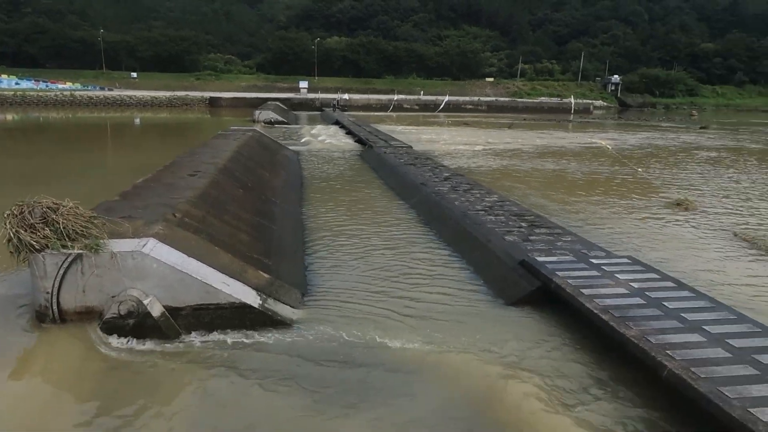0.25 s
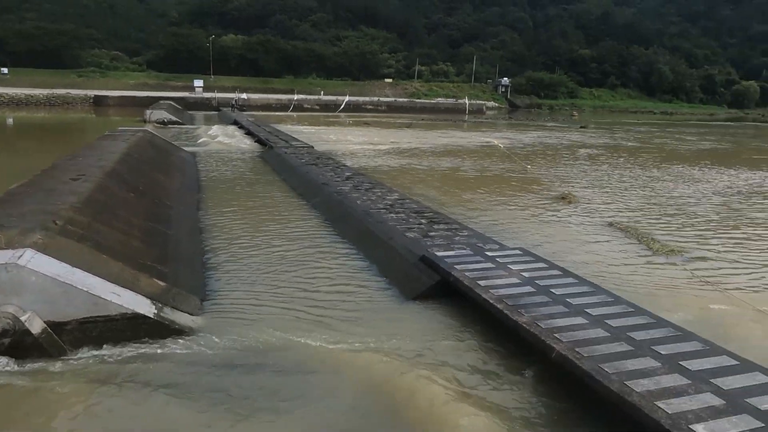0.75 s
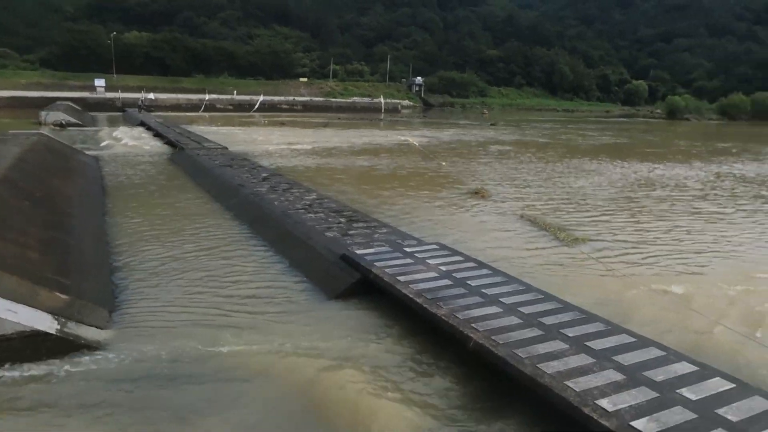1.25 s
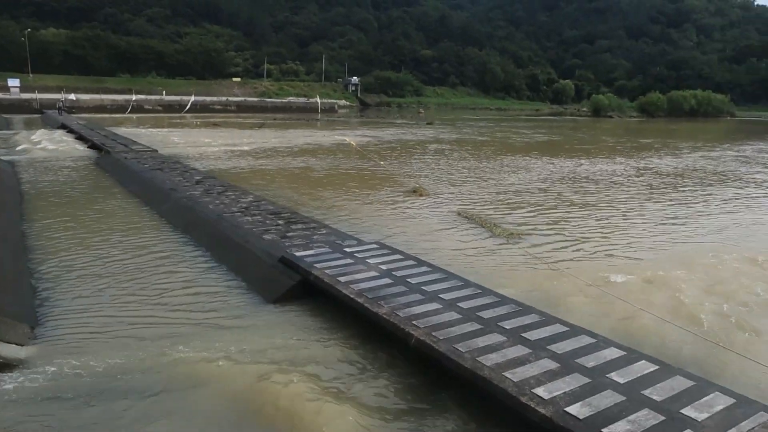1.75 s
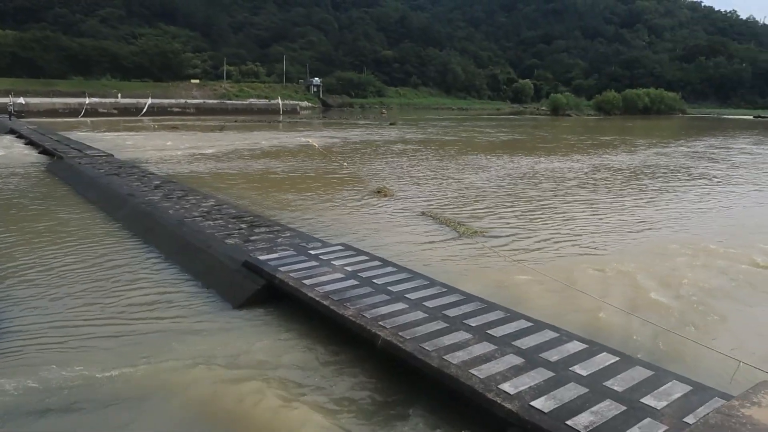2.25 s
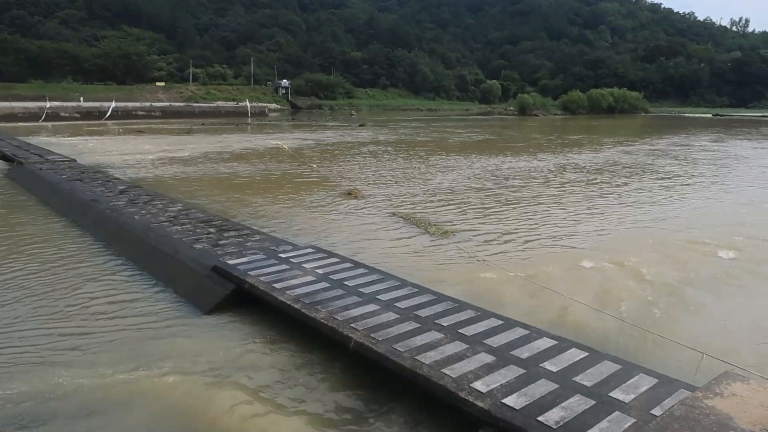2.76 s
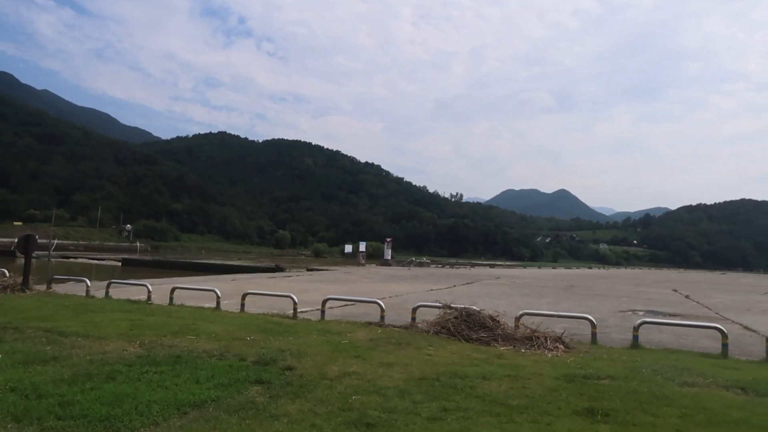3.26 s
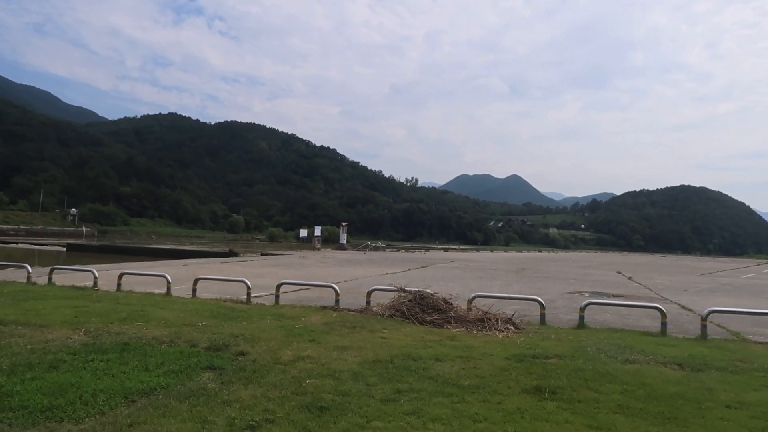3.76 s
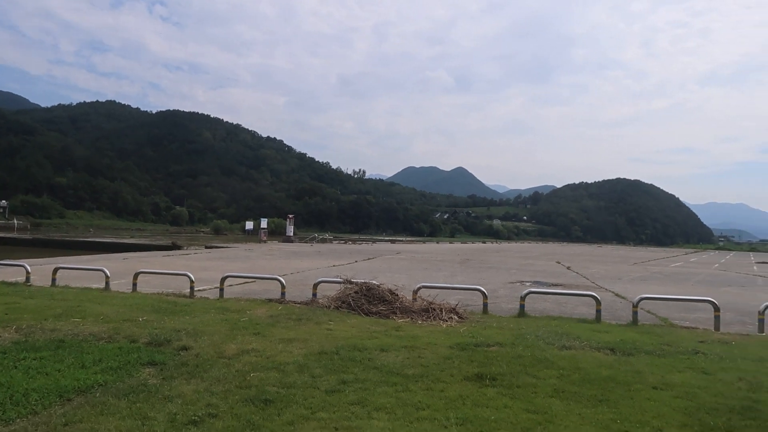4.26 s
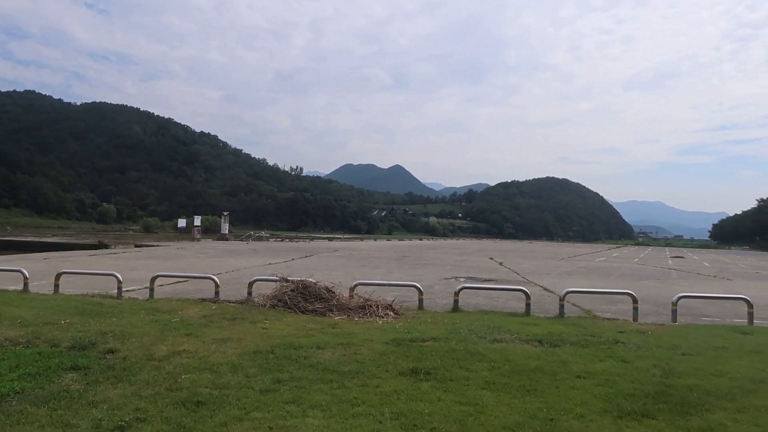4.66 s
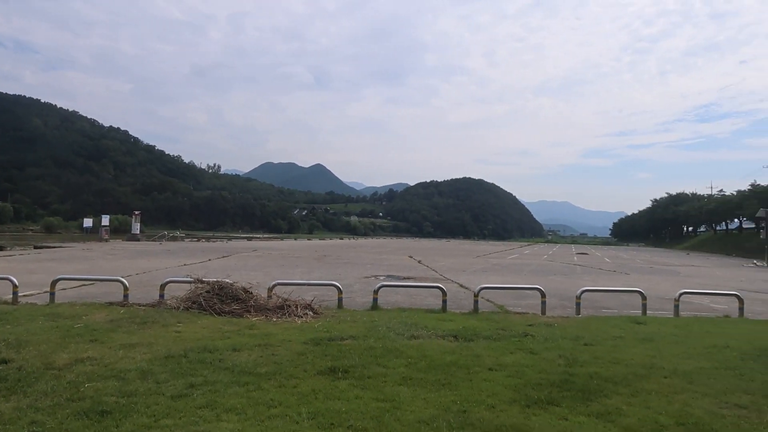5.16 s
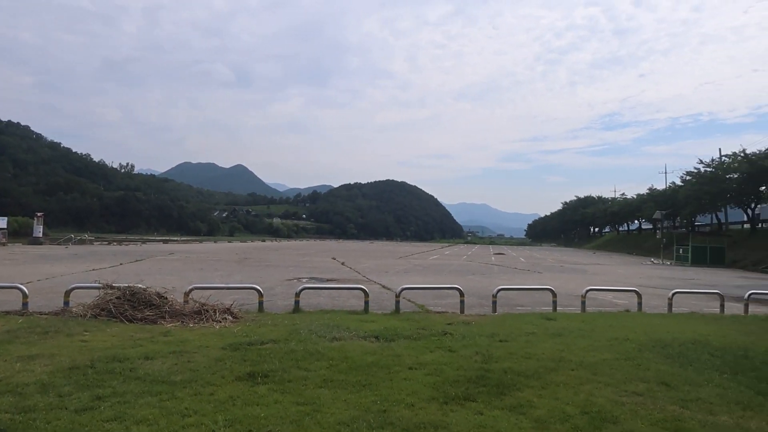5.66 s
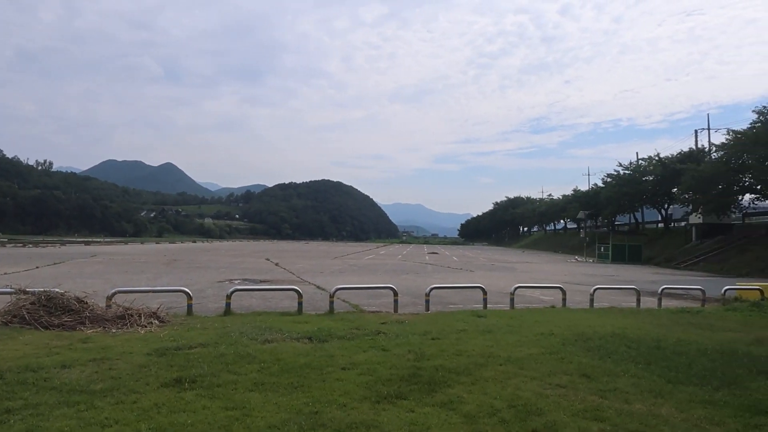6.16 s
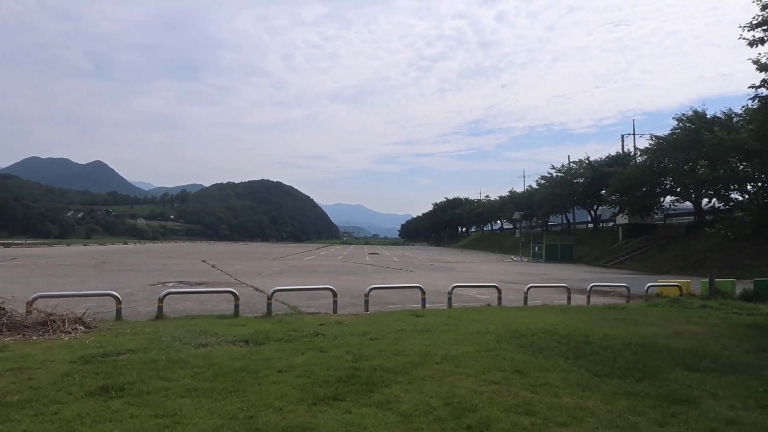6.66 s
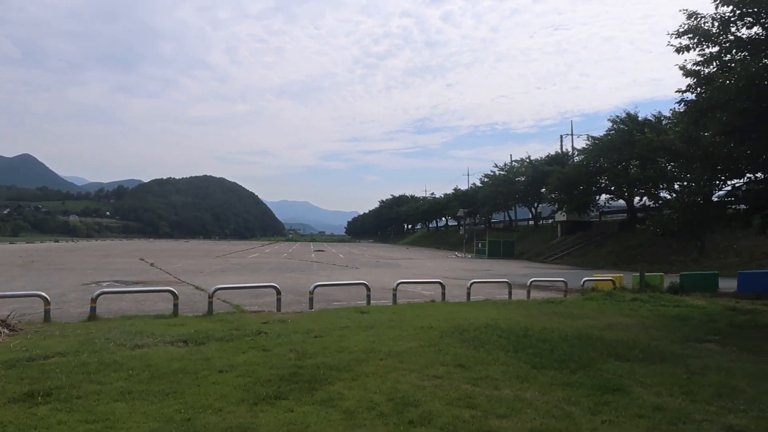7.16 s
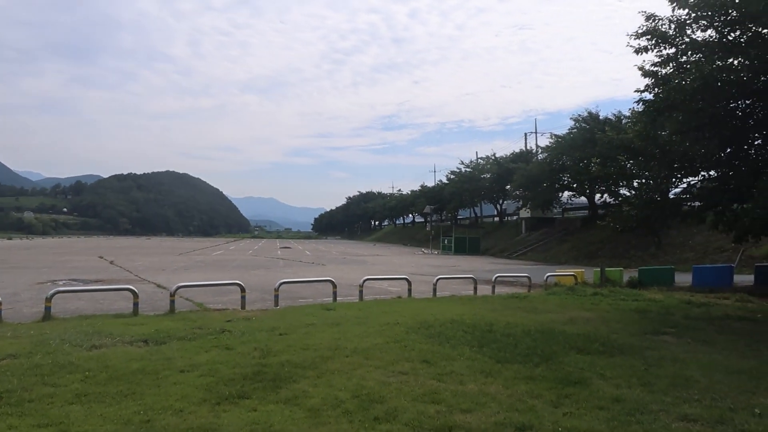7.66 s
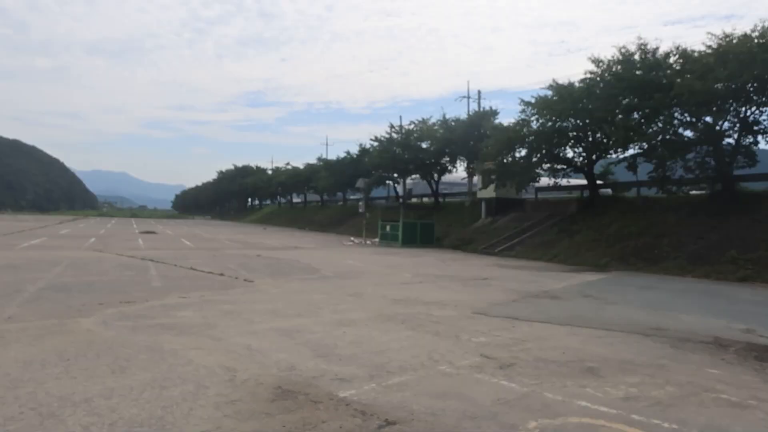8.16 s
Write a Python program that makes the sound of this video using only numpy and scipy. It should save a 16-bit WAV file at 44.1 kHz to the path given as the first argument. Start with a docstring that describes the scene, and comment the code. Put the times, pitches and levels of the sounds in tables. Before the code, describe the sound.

River water rushes loudly over a concrete weir outdoors, with hissing spray, bubbling and a few deep glugs. After about three seconds it cuts off, and cicadas take over in the trees beside a quiet riverside lot. One high-pitched buzz leads, then blends into a swelling chorus as the microphone turns towards the trees. A faint low wash of the valley lies behind them.

```python
"""Cicadas buzz in the trees by a quiet riverside lot, heard after a river roars over a concrete weir.
First comes the weir: clouds of ringing bubbles, spray and big glugs, over a low drone. After a short
silence, one cicada sings in front of a chorus, snapping the ribs of its tymbals (tiny drums on its body).
The valley murmurs and hums behind them, and there is one faint chirp. The camera turns towards the
trees, so they grow louder; for the last moment it stands closer to them."""
import sys
import numpy as np
from scipy import signal
from scipy.fft import rfft, irfft, next_fast_len
from scipy.io import wavfile
from scipy.ndimage import uniform_filter1d

SR = 44100
rng = np.random.default_rng(int(sys.argv[2]) if len(sys.argv) > 2 else 0)


def waveform_to_disk(signal):
    """Save audio, clipped to [-1, 1], as 16-bit WAV at the path in sys.argv[1]."""
    frames = np.transpose(np.atleast_2d(signal))
    scaled = np.clip(frames, -1, 1) * 32767
    samples = np.round(scaled).astype(np.int16)
    wavfile.write(sys.argv[1], SR, samples)


N = 370868
TIME = np.arange(N) / SR
WEIR_END_S, LOT_START_S, CLOSER_S = 2.846, 2.891, 8.217

# the weir's roar as the camera hears it, with microphone resonances near 3600 and 4650 Hz:
# (frequency [Hz], relative level [dB])
PLUNGE_TONE = [(25, -45), (45, -53), (85, -13), (130, -10.5), (160, -6), (250, -2.5), (370, -0.5),
               (480, -2.5), (620, -9.5), (900, -67)]
RUSH_TONE = [(350, -46), (620, -5), (840, 0), (1000, -2.5), (1230, -0.5), (1900, -8.5), (2600, -8.5),
             (3600, -35.5)]
SPRAY_AS_HEARD = [(2000, -22), (3050, -8), (3600, -0.5), (4200, -4.5), (4650, 1.5), (5300, -2), (6200, -1),
                  (8000, -9), (10500, -19.5), (13000, -28), (15500, -53)]
# the loudest glugs of the plunge: (time [s], pitch [Hz], peak level [dB])
BIG_GLUGS = [(0.546, 382, -26), (0.661, 390, -27), (0.932, 371, -30), (1.156, 433, -29), (1.235, 365, -30),
             (1.585, 282, -29.5), (1.865, 494, -29.5), (2.178, 357, -30), (2.395, 510, -29.5),
             (2.795, 387, -30)]
# a cicada's ribs snap in, then out: (place in the cycle [0-1], relative level [dB], pitch [Hz])
RIB_SNAPS = [(0.061, -11, 5200), (.16, -3.5, 8150), (.24, -3, 5190), (.35, -9, 8150), (.42, -2, 5130),
             (.51, -2.5, 8000), (.58, -0.5, 5130), (.70, -2.5, 8200)]
# the tone of the cicadas' song: (frequency [Hz], relative level [dB])
SONG_TONE = [(2400, -46), (3000, -21), (3500, -8), (4200, -6), (4800, -2.5), (6000, -2), (7800, -4),
             (9700, -9.5), (11200, -11.5), (12200, -22.5), (14000, -29.5), (15000, -51)]
# shrill peaks and dips heard in one cicada and in the chorus: (frequency [Hz], width [Hz], boost [dB])
NEAR_PEAKS = [(3360, 90, 4), (3530, 110, 3.5), (3960, 90, 6), (4070, 100, -6), (4400, 160, 4),
              (4540, 90, -2.5), (4740, 100, 4), (4930, 130, -2.5), (5297, 70, 6), (5445, 70, -4),
              (5534, 80, 5.5), (5750, 200, 1.5), (6125, 100, 2), (6305, 90, -3), (6480, 80, -3),
              (6740, 110, -4), (6847, 100, 5.5), (7213, 100, 4), (7450, 110, -2.5), (7816, 130, 6),
              (8053, 150, -4), (8290, 100, -2), (8936, 200, 2), (9370, 150, 2), (9560, 130, -3),
              (10720, 150, 3), (11240, 180, 3), (12320, 200, 4), (12835, 160, 7)]
CHORUS_PEAKS = [(2830, 110, 5), (3380, 90, 2.5), (3530, 120, 3), (4050, 80, -3), (4651, 80, 5.5),
                (5297, 80, 4.5), (5447, 70, -3), (5534, 70, 2), (5650, 600, 1.5), (5857, 90, 4.5),
                (6007, 80, 4.5), (6869, 110, 2), (7622, 90, 2), (7816, 110, 3.5), (8333, 130, -3),
                (8677, 90, 5), (8979, 130, -2), (9570, 160, -3.5), (10600, 600, -3.5), (11200, 300, 1),
                (12500, 600, 3)]
# one cicada leads, then sinks into the chorus: (time [s], cicada level [dB], chorus level [dB])
SONG_LEVELS = [(2.9, -44.5, -41.5), (4.1, -36, -42), (5.0, -35.5, -40.5), (5.9, -33.5, -41),
               (6.3, -34.5, -37.5), (6.7, -34.5, -37.5), (7.45, -35, -33), (8.2, -39.5, -30.5)]
# whines in the trees: (start [s], end [s], pitch [Hz], width [Hz], level [dB])
TREE_WHINES = [(2.5, 3.9, 5540, 90, -56), (3.5, 5.25, 5500, 280, -49.5), (3.6, 5.1, 4330, 170, -54),
               (4.9, 8.7, 4690, 110, -50), (5.6, 6.9, 3360, 110, -59)]
# the valley's wash, the far-off weir and a murmur by the trees: (frequency [Hz], relative level [dB])
VALLEY_TONE = [(25, -32), (50, -17), (86, -4.5), (128, -3.5), (165, -4.5), (205, -4.5), (272, -3.5),
               (320, -6), (550, -8.5), (850, -9), (1700, -13.5), (2800, -14), (3800, -47)]
FAR_WEIR_TONE = [(50, -12), (100, 9), (220, 9), (330, -6), (560, -15), (800, 0.5), (1250, -1), (1900, -15),
                 (3600, -40)]
MURMUR_TONE = [(50, -15), (100, 4), (170, 7), (300, -4), (480, 4), (620, -1.5), (850, 5), (1200, -12),
               (2500, -17), (4000, -35)]
# a distant hum: (pitch [Hz], width [Hz], level [dB])
HUM_NOTES = [(97.6, 12, -75), (169, 25, -67), (273, 24, -68)]
# how alike each source is in the left and right microphones: (frequency [Hz], likeness [0-1])
WEIR_ALIKE = [(130, .999), (300, .994), (650, .96), (1400, .84), (2600, .62), (4300, .15), (7200, .48),
              (10000, .2), (15000, .15)]
NEAR_ALIKE = [(3000, 0.4), (4200, 0.93), (5800, 0.88), (8000, 1), (11000, 0.92), (13000, 1)]
CHORUS_ALIKE = [(2900, .35), (3500, 0.51), (4600, 0.67), (5500, 0.7), (6600, 0.82), (7500, 0.68),
                (9000, 0.58), (11300, 0.84), (14000, 0.75)]
VALLEY_ALIKE = [(130, .999), (300, .985), (650, .92), (1400, .75), (2600, .5)]
# how far the left wave runs ahead of the right (trees: when side-on): (frequency [Hz], lead [rad])
WEIR_LEAD = [(100, 0), (500, .1), (1700, .45), (3000, .7), (5000, 2.9), (8000, 3.2), (13000, 5)]
TREES_LEAD = [(2500, -2.1), (3700, -2.75), (4700, -2.95), (6000, -3.75), (8400, -5.9), (11300, -8),
              (14000, -10.3)]
VALLEY_LEAD = [(100, 0), (400, .08), (900, .3), (2200, .8)]


def gain_of(db):
    """Turns decibels into a number to multiply a sound by."""
    return 10 ** (np.asarray(db) / 20)


def evened(x):
    """Scales a signal so that its average strength (rms) is 1."""
    return x / np.sqrt(np.mean(x ** 2) + 1e-20)


def look_up(table, hz):
    """Reads between the rows of a table, giving each octave equal room."""
    row_hz, value = np.transpose(table)
    return np.interp(np.log(hz + 1), np.log(row_hz + 1), value)


def colour(x, tone):
    """Gives a sound the tone in a table, at strength 1."""
    size = next_fast_len(N)
    gains = gain_of(look_up(tone, np.fft.rfftfreq(size, 1 / SR)))
    return evened(irfft(rfft(x, size) * gains, size)[..., :N])


def hiss():
    """Two unrelated plain noises, left and right."""
    return rng.standard_normal((2, N))


def narrow_noise(hz, width_hz):
    """Two unrelated noises, each ringing around one pitch."""
    size = next_fast_len(N)
    off_pitch = 2 * (np.fft.rfftfreq(size, 1 / SR) - hz) / width_hz
    spectrum = rfft(rng.standard_normal((2, size))) / np.sqrt(1 + off_pitch ** 4)
    return evened(irfft(spectrum, size)[:, :N])


def wander(length_s):
    """A smooth random curve that changes over about length_s."""
    size = next_fast_len(N)
    smoothing = np.exp(-(np.fft.rfftfreq(size, 1 / SR) * length_s) ** 2)
    return evened(irfft(rfft(rng.standard_normal(size)) * smoothing)[:N])


def patches(shape, size):
    """Smooth random patches; size is (time steps, frequency bands)."""
    smooth_in_time = uniform_filter1d(rng.standard_normal(shape), size[0], 0)
    return evened(uniform_filter1d(smooth_in_time, size[1], 1))


def swell(start_s, end_s, fade_s):
    """Fades in, holds and fades out."""
    return np.clip(np.minimum(TIME - start_s, end_s - TIME) / fade_s, 0, 1)


def microphones(pair, alike, leads, side=1, spread=0, patchy_db=0, flicker_db=0):
    """Makes two sounds partly alike, left and right; a wide source is less alike in the treble."""
    hz, t, bands = signal.stft(pair, SR, nperseg=512, noverlap=384)
    left, other = bands.transpose(0, 2, 1)
    full_lead = look_up(leads, hz)
    lead, blur = (np.interp(t, TIME, v * np.ones(N))[:, None] * full_lead for v in (side, spread))
    same = np.clip(look_up(alike, hz), 0, 1) * np.exp(-blur ** 2 / 2)
    right = (same * left + np.sqrt(1 - same ** 2) * other) * np.exp(-1j * lead)
    waver_db = patchy_db * patches(left.shape, (24, 7)) + flicker_db * patches(left.shape, (3, 90))
    bands = np.array([left, right]) * gain_of(waver_db)
    return evened(signal.istft(bands.transpose(0, 2, 1), SR, nperseg=512, noverlap=384)[1][:, :N])


def bubbles(low_hz, high_hz, per_s, cycles, spread_db=3.0, sizes=24):
    """Bubbles of many sizes pinch off at random; each rings briefly and rises in pitch."""
    out = np.zeros((2, N))
    for hz in np.geomspace(low_hz, high_hz, sizes):
        age = np.arange(int(3 * cycles / hz * SR) + 8) * hz / SR / cycles
        ring = np.sin(2 * np.pi * cycles * age * (1 + 0.039 * age)) * np.exp(-2 * age)
        place, strength, chance = rng.random((2000, 3)).T  # 1000 possible bubbles for each side
        happens = chance < per_s * TIME[-1] / sizes / 1000
        gains = gain_of(spread_db * np.minimum(-np.log(1 - strength), 4)) * happens
        births = np.bincount((place * 2 * N).astype(int), gains, 2 * N).reshape(2, N)
        out += signal.oaconvolve(births, ring[None] / np.linalg.norm(ring), axes=1)[:, :N] * np.sqrt(hz)
    return evened(out)


def weir(plunge_db=-35.5, rush_db=-34.5, spray_db=-32.5, surge_db=0.53, surge_s=0.07):
    """Large bubbles gulp in the surging plunge; smaller ones babble in the rush and fizz in the spray."""
    gulps = bubbles(low_hz=239.8, high_hz=563, per_s=150, cycles=13.2)
    babble = bubbles(low_hz=583.5, high_hz=2667, per_s=600, cycles=10.2)
    fizz = bubbles(low_hz=2620, high_hz=13100, per_s=1400, cycles=4.4)
    surging = gain_of(plunge_db + surge_db * wander(surge_s))
    plunge = surging * colour(hiss() + gain_of(-20) * gulps, PLUNGE_TONE)
    rush = gain_of(rush_db) * colour(hiss() + gain_of(-14) * babble, RUSH_TONE)
    spray = gain_of(spray_db) * colour(hiss() + gain_of(-10) * fizz, SPRAY_AS_HEARD)
    water = plunge + rush + spray
    return np.std(water) * microphones(water, WEIR_ALIKE, WEIR_LEAD, patchy_db=0.8, flicker_db=0.16)


def drone(hz=53.0, db=-62, waver=0.13):
    """A faint, wavering low tone under the weir's roar."""
    sway = evened(uniform_filter1d(rng.standard_normal(N), 12000))
    return gain_of(db) * (1 + waver * sway) * np.sin(2 * np.pi * hz * TIME)


def glugs(swell_s=0.0079, rise_per_s=1.1):
    """Big air pockets close in the plunge; each swells, rings and rises a little in pitch."""
    out = np.zeros(N)
    for start, hz, db in BIG_GLUGS:
        age = np.maximum(TIME - start, 0)
        cycles = hz * age * (1 + rise_per_s * age / 2) + rng.random()
        loudness = gain_of(db) * age / swell_s * np.exp(1 - age / swell_s)
        out += loudness * np.sin(2 * np.pi * cycles)
    return out


def tymbals(first_hz=42.3, settled_hz=45.9, settle_s=2.9, ring_s=0.000662, jitter_cycles=0.006):
    """A muscle buckles the ribs in turn, speeding up until it settles; each snap rings briefly."""
    rate = settled_hz + (first_hz - settled_hz) * np.exp(-np.maximum(TIME - LOT_START_S, 0) / settle_s)
    cycles_done = np.cumsum(rate) / SR
    cycle, t = np.arange(int(cycles_done[-1])), np.arange(256) / SR
    hz, out = np.fft.rfftfreq(256, 1 / SR), np.zeros(N)
    for place, db, ring_hz in RIB_SNAPS:
        slip = jitter_cycles * rng.standard_normal(len(cycle))
        snap_at = np.searchsorted(cycles_done, cycle + place + slip)
        snaps = gain_of(db) * np.bincount(snap_at, minlength=N)[:N]
        burst = rng.standard_normal(256) * t * np.exp(-t / ring_s)
        flat_spectrum = np.exp(1j * np.angle(rfft(burst)))
        octaves_off = np.log2((hz + 1) / ring_hz)
        ring = irfft(flat_spectrum / np.hypot(1, octaves_off))
        out += signal.oaconvolve(snaps, evened(ring))[:N]
    return evened(out)


def foliage(x, echo_s=0.36, change_per_s=0.596, paths=3):
    """Leaves and trunks scatter a short, blurred echo; its paths change as the camera moves."""
    t = np.arange(SR // 3) / SR
    tails = rng.standard_normal((paths, 2, len(t))) * gain_of(-60 * t / echo_s)
    feeds = [x * np.cos(np.pi * (change_per_s * TIME + k / paths)) for k in range(paths)]
    echoes = [signal.oaconvolve(feed[None], tail, axes=1)[:, :N] for feed, tail in zip(feeds, tails)]
    return evened(sum(echoes))


def ringing(x, peaks, size=4096):
    """Narrow bands of the song ring on after each snap."""
    hz = np.fft.rfftfreq(size, 1 / SR)
    boost_db = sum(db / (1 + (2 * (hz - centre) / width) ** 2) for centre, width, db in peaks)
    # build the filter so that it rings after a snap, never before
    both_ways = irfft(np.log(gain_of(boost_db)))
    after_only = both_ways * (1 + np.sign(np.fft.fftfreq(size)))
    ring = irfft(np.exp(rfft(after_only)))
    return signal.oaconvolve(x, ring[None], axes=1)[:, :N]


def facing(start_rad=0.052, turn_rad_per_s=0.17, closer_rad=0.36):
    """The nearest cicada's angle, from the camera's right side towards its front."""
    turned = turn_rad_per_s * np.maximum(TIME - LOT_START_S, 0)
    return np.where(TIME > CLOSER_S, closer_rad, start_rad + turned)


def hollow(hz, t, start_hz=7700, rise_hz_per_s=260, width_hz=890, db=-6, end_s=4.9, fade_s=0.74):
    """A dip in the treble, in dB, that slides upward and closes as the turn goes on."""
    centre = start_hz + rise_hz_per_s * (t - LOT_START_S)
    depth_db = db * np.clip((end_s - t) / fade_s, 0, 1)
    return depth_db / (1 + (2 * (hz - centre) / width_hz) ** 2)


def turning(song, angle, near_share, open_rad=0.4, shade_db_per_rad=40, open_db=1.4, closer_db=4):
    """The camera's body shades the top treble until it has turned; up close the song is brighter."""
    hz, t, bands = signal.stft(song, SR, nperseg=1024, noverlap=768)
    hz = hz[:, None]
    # narrow bands swell and fade at random, most while the nearest cicada leads
    shimmer_db = 0.5 * np.interp(t, TIME, near_share) * patches((len(t), len(hz)), (160, 2)).T
    treble_db = open_db - shade_db_per_rad * np.maximum(open_rad - angle, 0)
    treble_db += closer_db * (TIME > CLOSER_S)
    top_treble = (1 + np.tanh((hz - 10450) / 440)) / 2  # a soft step up at 10450 Hz
    bands = bands * gain_of(shimmer_db + np.interp(t, TIME, treble_db) * top_treble + hollow(hz, t))
    return signal.istft(bands, SR, nperseg=1024, noverlap=768)[1][:, :N]


def cicadas(closer_near_db=-31, closer_chorus_db=-33, chorus_behind_rad=0.41, chorus_spread_rad=0.2):
    """One buzzing insect stands out from a blurred chorus; both move round as the camera turns."""
    angle, close = facing(), TIME > CLOSER_S
    times, near_db, chorus_db = np.transpose(SONG_LEVELS)
    near_gain = gain_of(np.where(close, closer_near_db, np.interp(TIME, times, near_db)))
    chorus_gain = gain_of(np.where(close, closer_chorus_db, np.interp(TIME, times, chorus_db)))
    buzz = tymbals()
    echo = foliage(buzz)
    near = np.array([buzz + 0.58 * echo[0], echo[1]])
    near = colour(ringing(near, NEAR_PEAKS), SONG_TONE)
    near = microphones(near, NEAR_ALIKE, TREES_LEAD, side=np.cos(angle))
    chorus = hiss() + gain_of(-6.5) * foliage(buzz)
    chorus = colour(ringing(chorus, CHORUS_PEAKS), SONG_TONE)
    chorus = microphones(chorus, CHORUS_ALIKE, TREES_LEAD, side=np.cos(angle - chorus_behind_rad),
                         spread=chorus_spread_rad * np.sin(angle), patchy_db=0.45, flicker_db=0.5)
    near_share = near_gain ** 2 / (near_gain ** 2 + chorus_gain ** 2)
    song = turning(near_gain * near + chorus_gain * chorus, angle, near_share)
    return song * gain_of([[0.4], [-0.4]])  # a little louder on the left


def whines(fade_s=0.48):
    """Shrill bands of the song swell all around in the trees and sink back."""
    return sum(gain_of(db) * swell(start, end, fade_s) * narrow_noise(hz, width)
               for start, end, hz, width, db in TREE_WHINES)


def valley(wash_db=-57, far_weir_db=-60, murmur_db=-54.5, turned_away_s=4.2, fade_db_per_s=5):
    """A dull wash, a far-off weir that fades as the camera turns away, and a murmur by the trees."""
    faded_db = fade_db_per_s * np.maximum(TIME - turned_away_s, 0)
    wash = gain_of(wash_db) * colour(hiss(), VALLEY_TONE)
    wash += gain_of(far_weir_db - faded_db) * colour(hiss(), FAR_WEIR_TONE)
    wash += gain_of(murmur_db) * (TIME > CLOSER_S) * colour(hiss(), MURMUR_TONE)
    return np.std(wash) * microphones(wash, VALLEY_ALIKE, VALLEY_LEAD, patchy_db=1.2)


def hum():
    """Unsteady low tones from far away, the same on both sides."""
    return sum(gain_of(db) * narrow_noise(hz, width)[0] for hz, width, db in HUM_NOTES)


def chirp(start_s=7.052, length_s=0.046, hz=2730, width_hz=200, db=-60):
    """One faint, short chirp, perhaps a distant bird."""
    return gain_of(db) * swell(start_s, start_s + length_s, length_s / 3) * narrow_noise(hz, width_hz)[0]


def scene(fade_s=0.003):
    """First the weir, then a short silence, then the riverside lot."""
    at_weir = np.clip((WEIR_END_S - TIME) / fade_s + 0.5, 0, 1)
    river = weir() + drone() + glugs()
    lot = cicadas() + whines() + valley() + hum() + chirp()
    return river * at_weir + lot * (TIME > LOT_START_S)


def record(dry):
    """The camera picks up nothing above about 15600 Hz."""
    treble_cut = signal.firwin(511, 15600, window=("kaiser", 9), fs=SR)
    return signal.oaconvolve(dry, treble_cut[None], "same")


dry = scene()
out = record(dry)
waveform_to_disk(out)
```